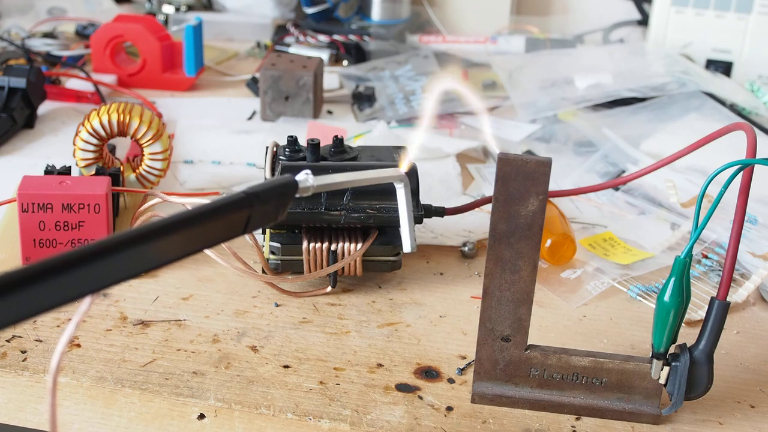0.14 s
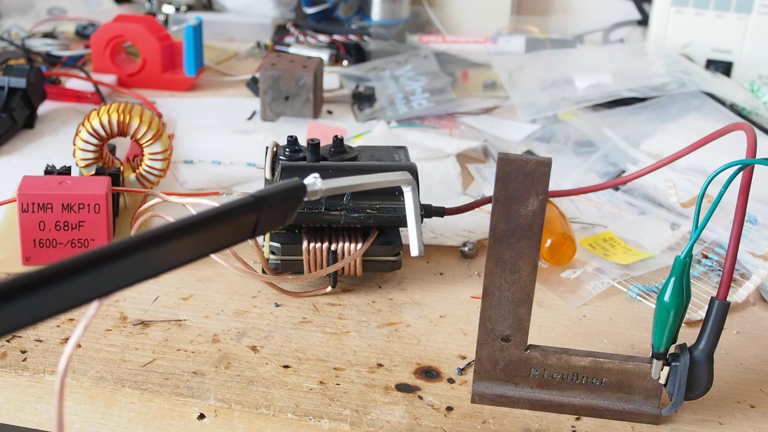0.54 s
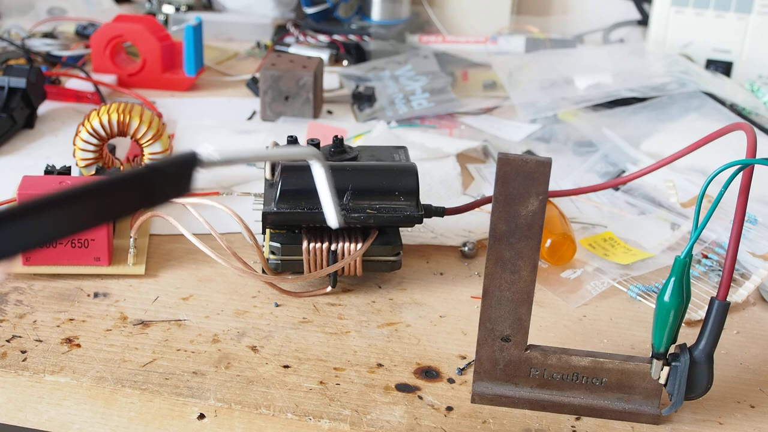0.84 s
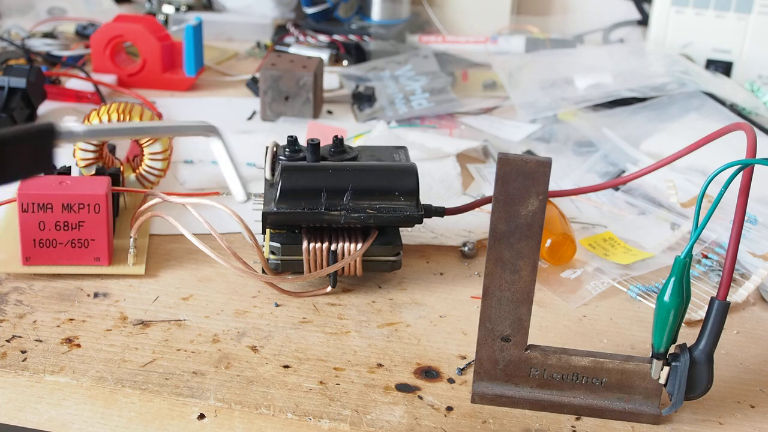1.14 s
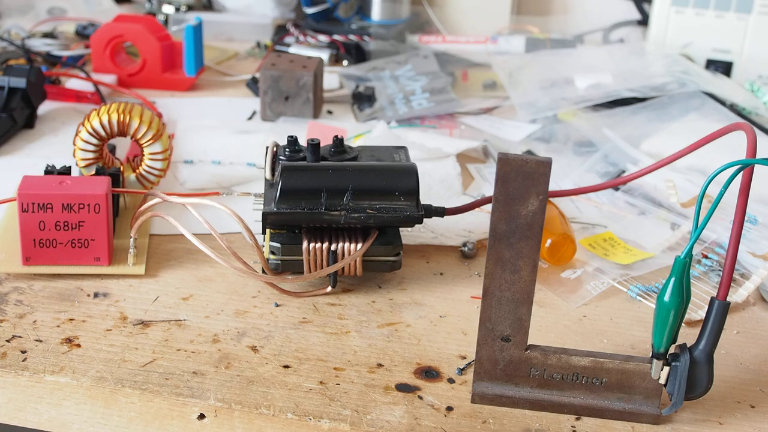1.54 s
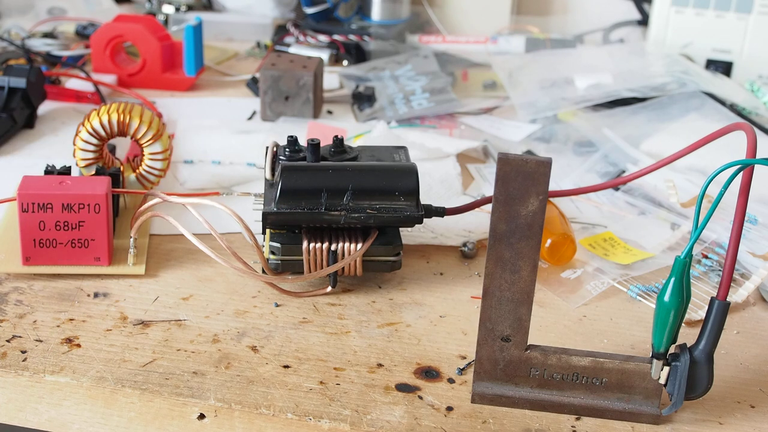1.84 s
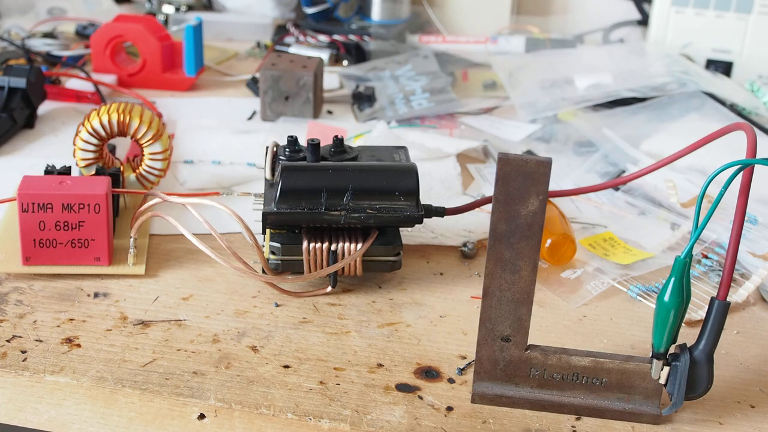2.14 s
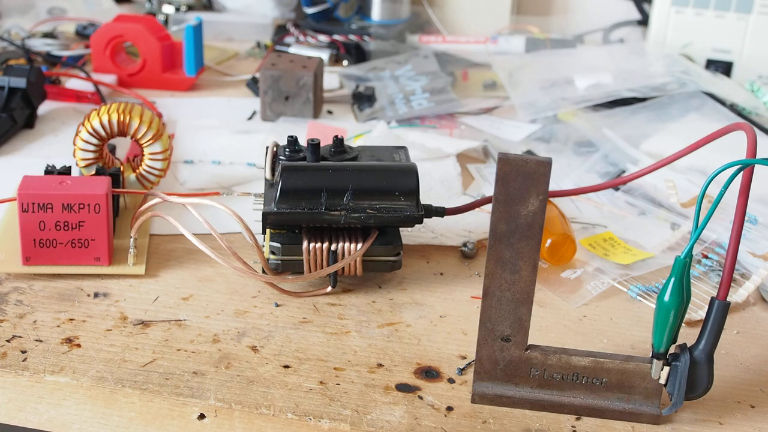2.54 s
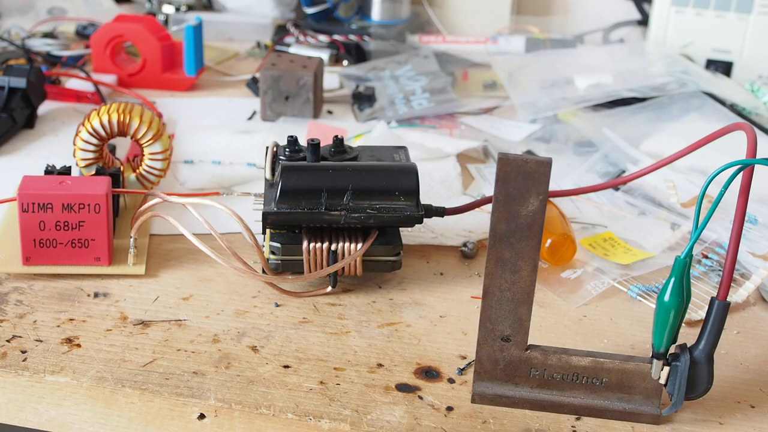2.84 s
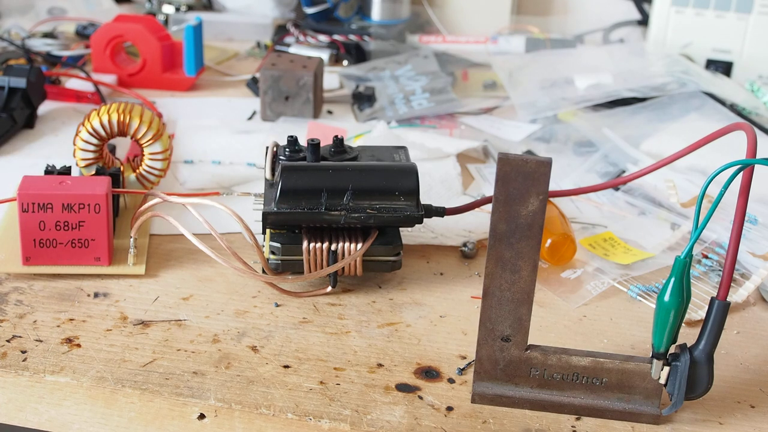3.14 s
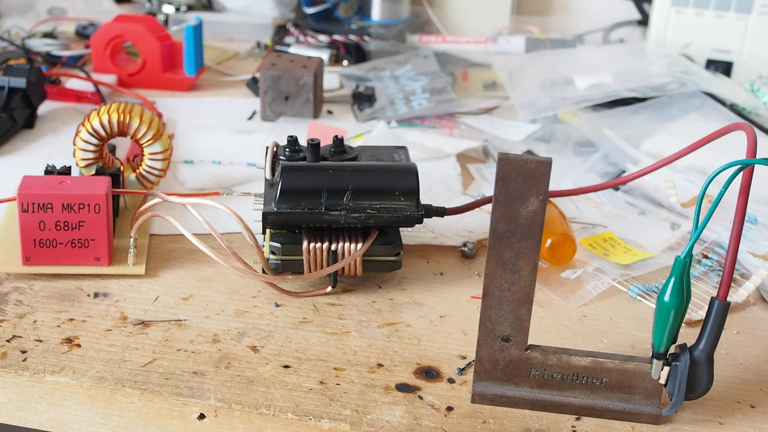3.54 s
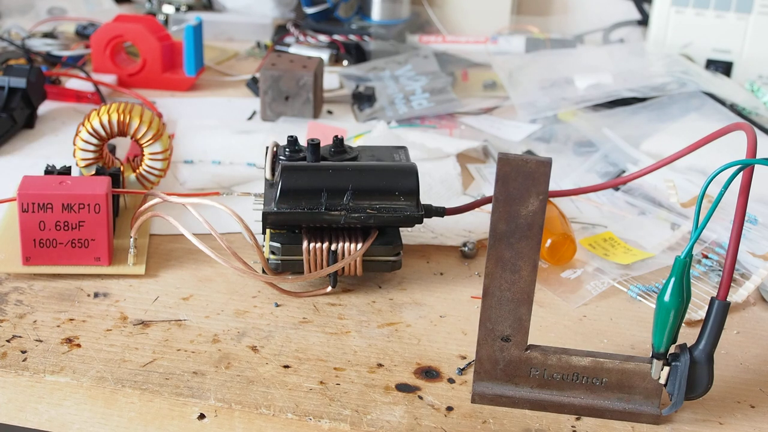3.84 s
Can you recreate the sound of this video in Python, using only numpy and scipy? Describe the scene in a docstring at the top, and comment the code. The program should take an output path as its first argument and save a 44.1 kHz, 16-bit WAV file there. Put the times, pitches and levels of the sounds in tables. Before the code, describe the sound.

High-voltage arc cracks in harsh quick snaps, then low fan noise rises and holds steady

```python
"""A high-voltage arc on a workbench breaks off in a few sharp snaps, each a very fast train of sparks in a small room.
The snaps overload the recorder and push its gain far down.
As the gain recovers, the rush of a cooling fan, made of coloured noise, swells up with its hum tones and stays.
Later a thin treble hiss comes and goes, and a few faint ticks from the bench are short bursts of noise."""
import sys
import numpy as np
from scipy import signal
from scipy.fft import rfft, irfft, next_fast_len
from scipy.io import wavfile
from scipy.ndimage import uniform_filter1d, minimum_filter1d, map_coordinates

SR = 44100
rng = np.random.default_rng(int(sys.argv[2]) if len(sys.argv) > 2 else 0)


def wrap_up_sound(samples):
    """Save the sound to the file named by the first command line argument, as 16-bit audio."""
    columns = np.atleast_2d(samples).T
    # keep every value between -1 and 1, then stretch to whole-number steps
    tamed = np.clip(columns, -1, 1)
    steps = np.round(tamed * 32767).astype(np.int16)
    wavfile.write(sys.argv[1], SR, steps)


N = 176400  # samples: 4 s

# How alike left and right are in the fan and the hiss: pitch_hz, likeness (1 = the same)
LIKENESS = [(30, .7), (125, 0.88), (300, 0.93), (600, 0.92), (1200, 0.83), (2500, .55), (5000, .35),
            (12000, .15)]


def amp(db):
    """Turn decibels into a gain."""
    return 10 ** (np.asarray(db) / 20)


def unit(x):
    """Scale a sound to an average strength (rms) of 1."""
    return x / np.sqrt(np.mean(np.abs(x) ** 2) + 1e-20)


def along(points, hz):
    """Read a curve of (pitch_hz, value) points, with straight lines on a log pitch axis."""
    point_hz, value = np.transpose(points)
    return np.interp(np.log(hz + 1), np.log(point_hz + 1), value)


def wobble(rate):
    """A smooth random curve with the given number of random points a second."""
    points = rng.standard_normal(N // 8)
    return map_coordinates(points, [np.arange(N) * rate / SR + 4], mode="wrap")


def filtered(x, response):
    """Change the strength and phase of each pitch in x, as response(hz) says."""
    size = next_fast_len(x.shape[-1] + SR // 4)
    spectrum = rfft(x, size) * response(np.fft.rfftfreq(size, 1 / SR))
    return irfft(spectrum, size)[..., :x.shape[-1]]


def causal(colour_db):
    """Spectrum of a click of peak 1 with this colour, its energy as early as possible (minimum phase)."""
    cepstrum = irfft(np.log(amp(colour_db)))
    half = len(cepstrum) // 2
    cepstrum[1:half] *= 2
    cepstrum[half + 1:] = 0
    spectrum = np.exp(rfft(cepstrum))
    return spectrum / np.abs(irfft(spectrum)).max()


def stereo_noise(alike, size):
    """White noise in two channels, mixed from a shared and an opposite part to be as alike as alike(hz)."""
    def shares(hz):
        turn = np.arccos(np.clip(alike(hz), -1, 1)) / 2
        return np.array([np.cos(turn), np.sin(turn)])

    mid, side = filtered(rng.standard_normal((2, size)), shares)
    return np.array([mid + side, mid - side])


def left_first(x, ms):
    """Let the left channel lead the right by ms, by moving each channel half of that."""
    lead_s = np.array([[ms], [-ms]]) / 1000
    return filtered(x, lambda hz: np.exp(1j * np.pi * hz * lead_s))


def arc(size=2048):
    """Each snap is a fading train of sparks, thousands a second, with its own colour, answered by the room."""
    # Snaps of the arc: start_s, level_db, length_ms, spark_rate_hz, fade_db_per_ms, thump_db, upper_mids_db
    snaps = [(-.028, 30.5, .8, 4500, 12, 0, 2), (.0359, 33, .6, 4400, 35, -2, 0),
             (.0504, 33, 1.05, 4600, 8, -1, -1), (.0539, 26, .85, 4400, 4, 0, 0),
             (.1105, 33, .6, 4550, 6, 4.5, -8), (.1587, 34, .55, 4300, 21, -9, -1),
             (.1593, 24.5, 1.25, 6650, 2.5, -6, 0), (.1617, 26.5, .6, 4200, 3, -3, 2),
             (.1637, 24, .8, 7100, 3, -3, 0)]
    # Colour of one spark before each snap's own changes: pitch_hz, level_db
    spark_colour = [(60, -70), (200, -29), (550, -24.5), (1400, -18.5), (2300, -6), (3200, -4.5),
                    (4200, -6), (5100, -2.5), (7000, -0.5), (9000, -5.5), (11000, -16), (12000, -25.5),
                    (13000, -20), (16000, -45.5)]
    spark_jitter = .08  # unevenness of the gaps, as a share of a gap
    thump_hz, mids_hz, mids_width_hz = 1300, 2300, 1130  # the two bands in which snaps differ
    smear_hz, smear_width_hz = 6240, 7800
    pre = SR // 10  # room ahead of time zero for a snap that starts earlier

    out = np.zeros((2, pre + N))
    hz = np.fft.rfftfreq(size, 1 / SR)
    # the microphone delays this band and spreads each click over a few swings
    smear = np.exp(-2j * np.arctan2(hz * smear_width_hz, smear_hz ** 2 - hz ** 2))
    lows = np.exp(-(hz / thump_hz) ** 2)
    mids = np.exp(-((hz - mids_hz) / mids_width_hz) ** 2)
    for start_s, level_db, length_ms, rate_hz, fade, thump_db, mids_db in snaps:
        colour_db = along(spark_colour, hz) + thump_db * lows + mids_db * mids
        spark = smear * causal(colour_db)
        gaps_s = (1 + spark_jitter * rng.standard_normal(size=16)) / rate_hz
        spark_s = np.cumsum(gaps_s) - gaps_s[0]
        spark_ms = spark_s * 1000
        strength = amp(level_db - fade * spark_ms) * (spark_ms < length_ms)
        # place the sparks by turning phases, so they can fall between samples
        timing = strength @ np.exp(-2j * np.pi * spark_s[:, None] * hz)
        train = irfft(spark * timing)
        snap = signal.fftconvolve(train[None], room(), axes=1)
        out[:, pre + round(start_s * SR):][:, :snap.shape[1]] += snap
    return out[:, pre:]


def room():
    """Direct path, near reflections and a noise tail that dies faster in the treble."""
    # Time in which the tail falls by 60 dB: pitch_hz, time_s
    tail_t60 = [(300, 0.57), (2000, 0.33), (5000, 0.33), (8000, 0.27), (13000, 0.2)]
    # Colour of the tail: pitch_hz, relative level_db
    tail_colour = [(200, -13), (1000, -2), (3000, 0.5), (7000, 0), (9500, 5.5), (12000, 7), (16000, -7.5)]
    # Near reflections: delay_s, level_db
    reflections = [(.0033, -11), (.0086, -17), (0.026, -34)]
    tail_db, tail_likeness, build_s = -11, 0.15, 0.00053

    noise = stereo_noise(lambda hz: tail_likeness + 0 * hz, size=SR // 2)
    hz, t, spectra = signal.stft(noise, SR, nperseg=256)
    decay = np.exp(-np.log(1000) * t / along(tail_t60, hz)[:, None])
    colour = amp(along(tail_colour, hz))[:, None]
    tail = signal.istft(spectra * decay * colour, SR, nperseg=256)[1]
    tail = tail * (1 - np.exp(-np.arange(tail.shape[1]) / SR / build_s))
    answer = amp(tail_db) * tail / np.linalg.norm(tail[0])
    answer[:, 0] += 1  # the direct path
    for delay_s, level_db in reflections:
        answer[:, round(delay_s * SR)] += amp(level_db)
    return answer


def fan():
    """Nearly steady air noise through fixed resonances, with wavering hum tones."""
    # Air noise before the resonances: pitch_hz, relative level_db (per Hz)
    air_colour = [(25, -35), (55, -26), (90, -21.5), (140, -14), (185, -7), (260, -3), (420, -2), (600, -8),
                  (900, -8.5), (1350, -6), (2000, -13), (3000, -17.5), (4200, -23), (5800, -28.5),
                  (8800, -32.5), (10500, -36.5), (15500, -43)]
    # Resonances that colour the air noise: pitch_hz, width_hz, lift_db
    resonances = [(190.8, 31, 10.5), (325, 16, 3), (381.2, 35, 7.5), (474, 52, 4), (614, 66, 7),
                  (693, 26, 4), (838.7, 26, 2), (1137, 27, 2.5), (1299, 8, 9), (1723, 33, 4.5),
                  (1855, 21, 1), (2013, 82, 3.5), (4950, 300, 4.5)]
    # Hum of the fan and the mains; the two strongest tones beat.
    # pitch_hz, level_db (before the swell), width_hz, unsteadiness (0-1)
    tones = [(100, -75, 1.03, .2), (124.4, -63.5, 3, 0.8), (231.7, -48.5, 2.2, 0.25), (238.9, -58.5, 3, .3),
             (11620, -85, 100, 0.97)]
    # The hum comes up a little after the air noise: time_s, change_db
    hum_swell = [(.27, -16), (.5, 0.5)]
    air_db, unsteady_db = -39.5, 0.03
    lag_ms, pan_db = 0.079, .3  # the fan stands a little to the left

    def colour(hz):
        lift_db = sum(db / (1 + (2 * (hz - centre) / width) ** 2) for centre, width, db in resonances)
        return amp(along(air_colour, hz) + lift_db)

    air = unit(filtered(stereo_noise(lambda hz: along(LIKENESS, hz), size=N), colour))
    sound = air * amp(air_db + unsteady_db * wobble(16.4))
    t = np.arange(N) / SR
    swell_db = np.interp(t, *np.transpose(hum_swell))
    for hz, level_db, width_hz, unsteady in tones:
        # a complex waver changes both the strength and the phase of the tone
        waver = 1 + unsteady * (wobble(2 * width_hz) + 1j * wobble(2 * width_hz))
        tone = unit(np.real(waver * np.exp(2j * np.pi * hz * t)))
        sound = sound + amp(level_db + swell_db) * tone
    pan = amp(pan_db * np.array([[1], [-1]]))
    return pan * left_first(sound, lag_ms)


def hiss():
    """A thin treble hiss: coloured noise whose level swells and recedes."""
    # Level of the hiss: time_s, level_db
    swell = [(.7, -75), (1.1, -68.5), (1.42, -60), (1.75, -63.5), (2.1, -63.5), (2.45, -69), (2.6, -59.5),
             (2.82, -61.5), (3, -67.5), (3.5, -68), (4, -71)]
    # Colour of the hiss: pitch_hz, relative level_db (per Hz)
    hiss_colour = [(2000, -30), (4500, -4), (6000, -0.5), (9000, 0.5), (10200, -10), (14000, -26)]
    noise = stereo_noise(lambda hz: along(LIKENESS, hz), size=N)
    noise = filtered(noise, lambda hz: amp(along(hiss_colour, hz)))
    level_db = np.interp(np.arange(N) / SR, *np.transpose(swell))
    return amp(level_db) * unit(noise)


def ticks():
    """Tiny soft ticks from the bench, each a quickly dying burst of noise."""
    # Ticks: start_s, level_db (before the rise, the fall and the final halving)
    tick_list = [(1.603, -40.5), (3.184, -50), (3.455, -47), (3.662, -45), (3.869, -49)]
    # Colour of the ticks: pitch_hz, relative level_db
    tick_colour = [(2500, -30), (5600, 4), (7000, -4), (9200, 0), (10500, -20), (14000, -35)]
    rise_s, t60_s = 0.0017, 0.057  # t60: time to fall by 60 dB

    def burst(age_s):
        return (1 - np.exp(-age_s / rise_s)) * np.exp(-np.log(1000) * age_s / t60_s)

    t = np.arange(N) / SR
    envelope = sum(amp(level_db) * burst(np.maximum(t - start_s, 0)) for start_s, level_db in tick_list)
    noise = filtered(rng.standard_normal((2, N)), lambda hz: amp(along(tick_colour, hz)))
    return .5 * envelope * unit(noise)


def scene():
    """The arc in front of the running fan, with the hiss and the ticks."""
    arc_lead_ms = .01  # the arc reaches the right microphone a little earlier
    return left_first(arc(), -arc_lead_ms) + fan() + hiss() + ticks()


def record(dry):
    """Gain control that drops at once and recovers in a fast and a slow stage, then clipping and a treble limit."""
    ceiling_db, knee = 1.27, 1.47  # a higher knee makes the gain control set in more sharply
    recovery_db_per_s = 146.5
    linger_share, linger_db_per_s = 0.13, 7.5  # part of the gain drop that recovers slowly
    start_level_db = 25.5  # level that the gain control still holds from the arc before
    top_hz = 16000

    t = np.arange(N) / SR

    def held(db, db_per_s):
        """Follow every rise at once, but fall no faster than db_per_s."""
        return np.maximum.accumulate(db + db_per_s * t) - db_per_s * t

    level_db = 20 * np.log10(np.abs(dry).max(axis=0) + 1e-9)
    level_db[0] = start_level_db
    over_db = held(level_db, recovery_db_per_s) - ceiling_db
    drop_db = 20 * np.log10(1 + amp(knee * over_db)) / knee
    slow_drop_db = held(linger_share * drop_db, linger_db_per_s)
    gain = amp(-(1 - linger_share) * drop_db - slow_drop_db)
    # a short look-ahead rounds each drop
    gain = uniform_filter1d(minimum_filter1d(gain, size=9), size=9)
    clipped = np.clip(dry * gain, -1, 1)
    return filtered(clipped, lambda hz: 1 / np.sqrt(1 + (hz / top_hz) ** 120))


dry = scene()
out = record(dry)
wrap_up_sound(out)
```